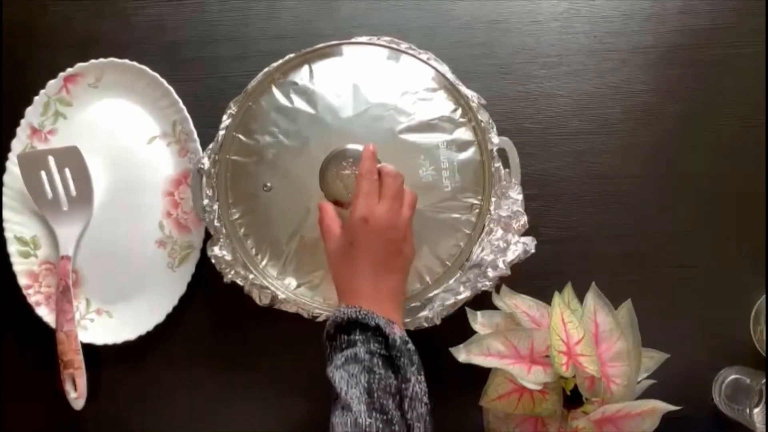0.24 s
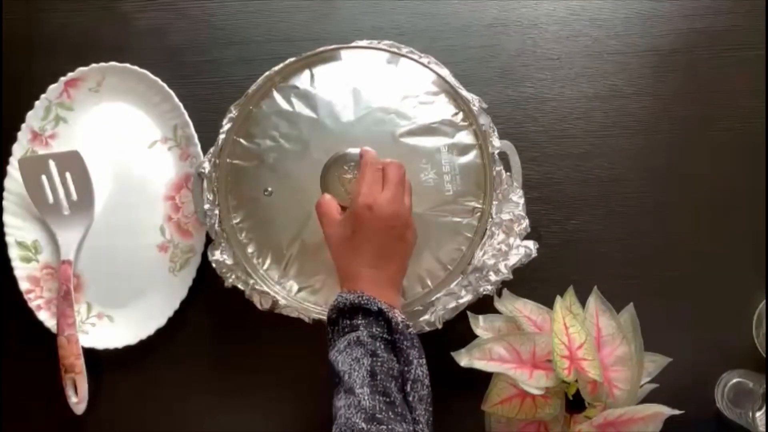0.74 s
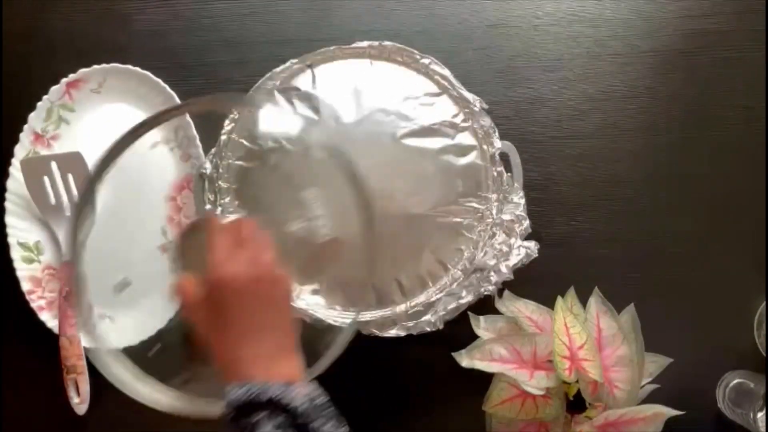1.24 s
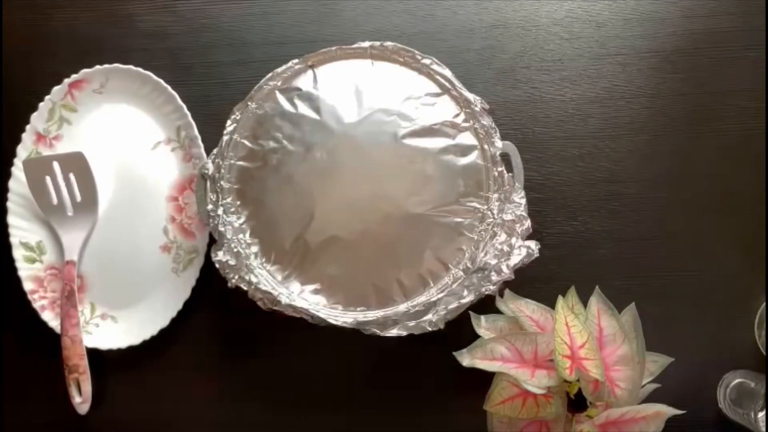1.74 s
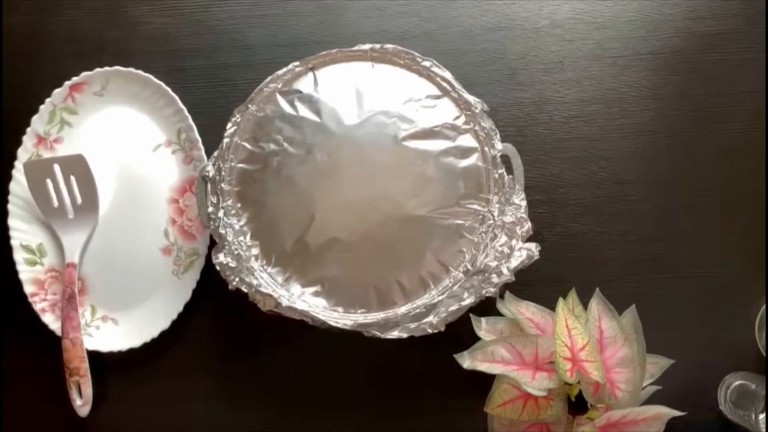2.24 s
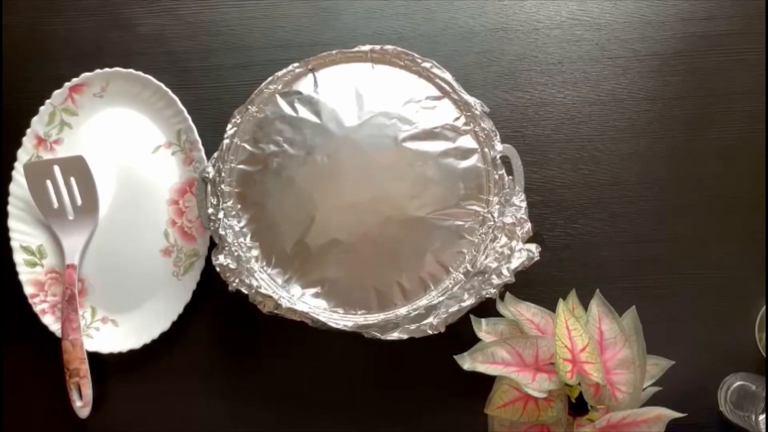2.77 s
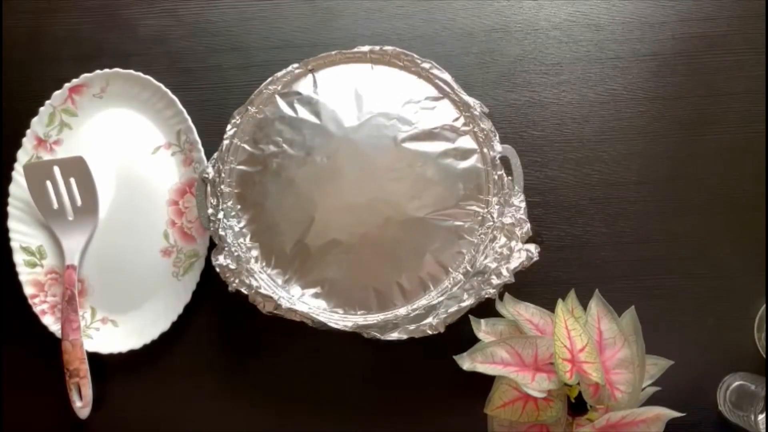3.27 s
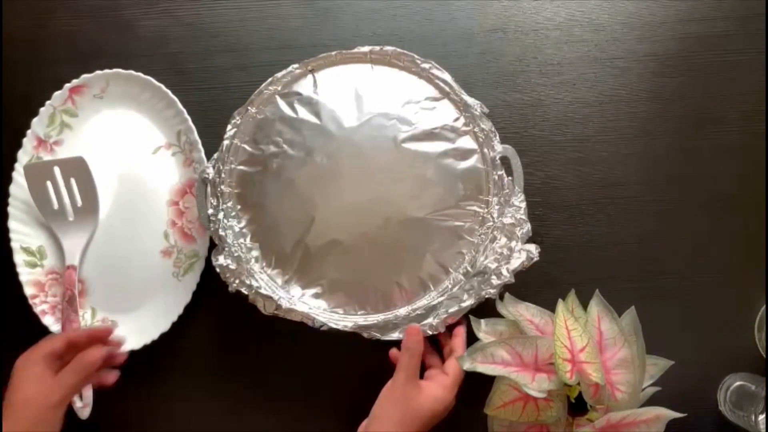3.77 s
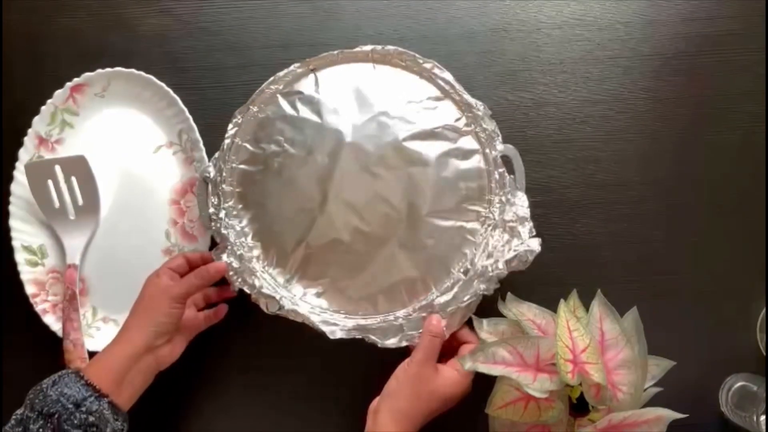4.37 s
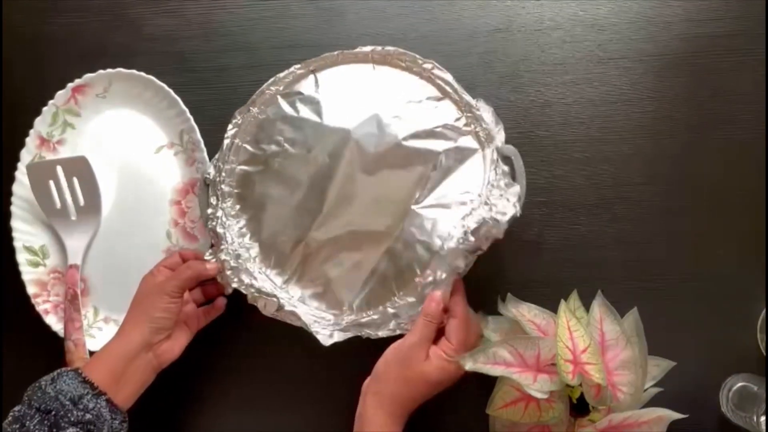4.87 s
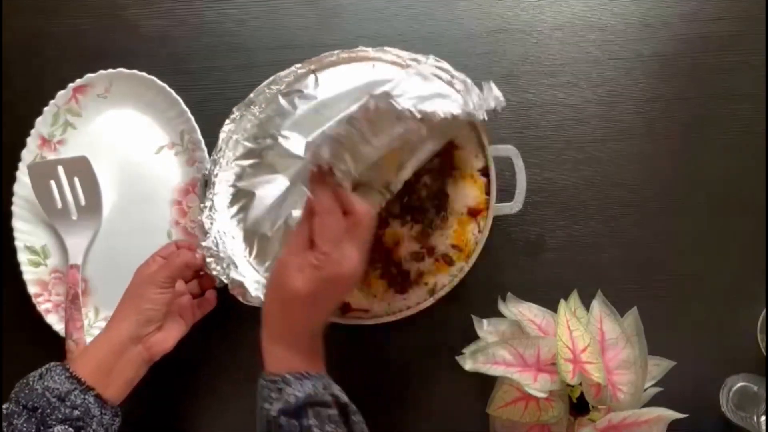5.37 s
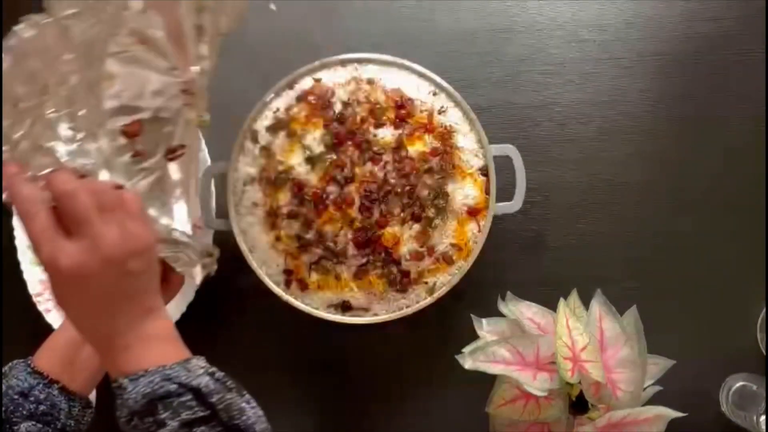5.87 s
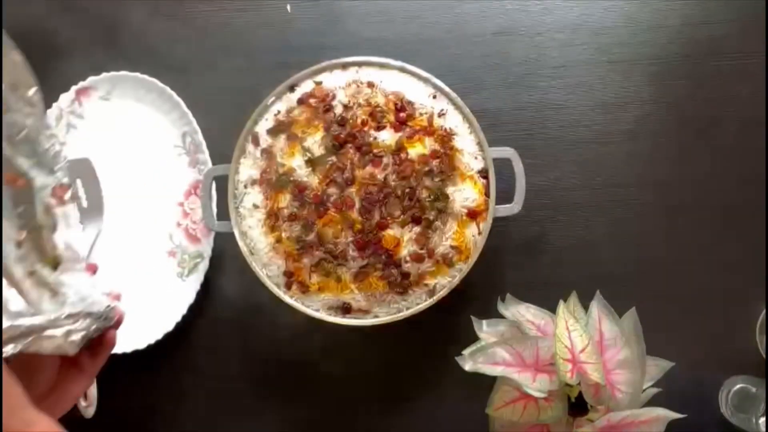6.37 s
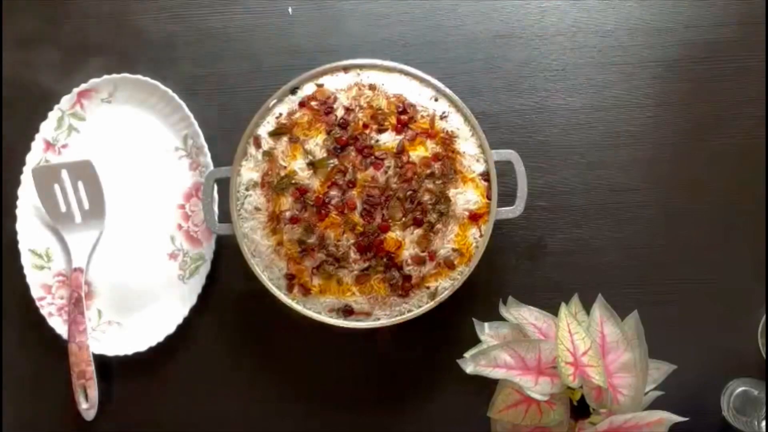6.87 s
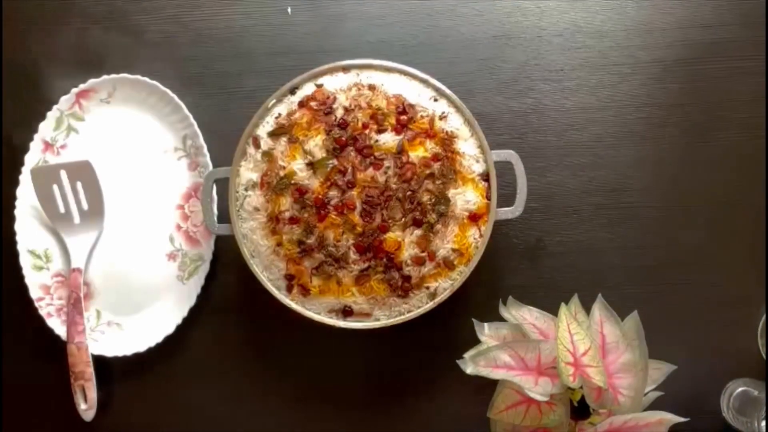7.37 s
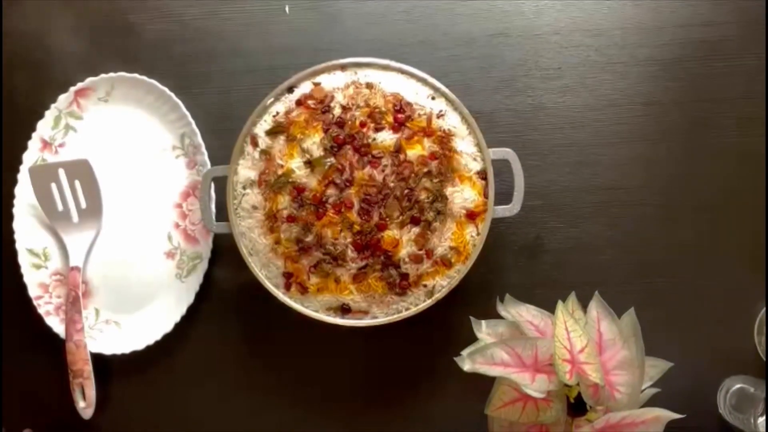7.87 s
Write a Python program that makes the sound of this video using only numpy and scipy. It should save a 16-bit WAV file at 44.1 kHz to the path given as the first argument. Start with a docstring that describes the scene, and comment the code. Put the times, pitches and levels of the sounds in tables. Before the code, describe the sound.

A lid comes off a foil-covered pot with a tiny crinkle and clink, slides faintly, and knocks twice on a surface a little farther away. After a quiet gap, close foil crackles in separate tugs, swells to a loud peel with snaps and dull drumming pops, then rustles softly as it is put aside. Steady low hum, live small kitchen, stereo microphones near the pot.

```python
"""Small, hard-walled kitchen: a glass lid leaves a foil-covered pot with ringing knocks and slides.
The foil is loosened, peeled back and put away: swarms of tiny filtered clicks follow each tug,
with sharp snaps (tick plus noise burst) and hollow pops (filtered bursts).
Behind: a bump on the table, motor and fan sines, filtered-noise air; two spaced ports pick it all up.
Table levels are relative; layer gains are added to them in scene()."""
import sys
import numpy as np
from scipy import signal
from scipy.fft import rfft, irfft, next_fast_len
from scipy.io import wavfile
from scipy.ndimage import uniform_filter1d

SR = 44100
rng = np.random.default_rng(int(sys.argv[2]) if len(sys.argv) > 2 else 0)


def waveform_to_disk(signal):
    """Save audio, clipped to [-1, 1], as 16-bit WAV at the path in sys.argv[1]."""
    frames = np.transpose(np.atleast_2d(signal))
    scaled = np.clip(frames, -1, 1) * 32767
    samples = np.round(scaled).astype(np.int16)
    wavfile.write(sys.argv[1], SR, samples)


N = 358091

# tugs and touches, from lifting the lid to peeling right off:
# peak_s, build_s, relax_s, flex_db (sheet), crumple_db (folds), crackle_db (creases)
FOIL_TUGS = [ (0.785, 0.058, 0.033, -53, -45, -48), (0.825, 0.018, 0.01, -42, -44, -45),
             (4.04, 0.035, 0.024, -53, -63, -53), (4.159, 0.01, 0.014, -50, -40, -40),
             (4.235, 0.029, 0.13, -44, -55, -41.5), (4.321, 0.032, 0.13, -41, -42, -41.5),
             (4.435, 0.028, 0.022, -39, -43.5, -39), (4.6, 0.029, 0.018, -38, -44, -60),
             (4.67, 0.05, 0.072, -35.5, -40, -36.5), (4.842, 0.045, 0.029, -35, -45, -32.5),
             (5.095, 0.0094, 0.0143, -55, -38, -47), (5.165, 0.019, 0.037, -42.5, -35.5, -41.5),
             (5.255, 0.042, 0.043, -34, -33.5, -36.5), (5.4, 0.029, 0.037, -32.5, -40, -29.5),
             (5.462, 0.033, 0.028, -35.5, -30.5, -28.5), (5.52, 0.053, 0.051, -37, -33, -37.5),
             (5.615, 0.07, 0.024, -39, -38, -39), (5.68, 0.019, 0.053, -48.5, -46, -55.5)]
# steady pull while peeling: start_s, end_s, flex_db, crumple_db, crackle_db
STEADY_PULL = (4.5, 5.5, -48, -45.5, -47.5)
PULL_EASE_S = 0.033
# colour of the broad sheet: freq_hz, level_db
FLEX_COLOUR = [(120, -31), (280, -6), (450, -1.5), (800, 0.7), (1450, 0.9), (2000, 2), (3000, -3),
               (4500, -18.5), (9000, -27.5)]
# colour of the folds: freq_hz, level_db
CRUMPLE_COLOUR = [(400, -22), (900, -8), (1400, -5), (1900, 0), (2450, 1), (3200, 2.5), (4200, -2),
                  (6000, -13), (11000, -24)]
# colour of the creases: freq_hz, level_db
CRACKLE_COLOUR = [(500, -29), (1500, -10.5), (2400, 1), (3100, 1), (4200, 1.5), (5200, 1), (6800, -1.5),
                  (8600, -6.5), (10000, -5.5), (11500, -10), (13000, -19)]


def crinkle(flex_db, crumple_db, crackle_db):
    """One swarm: dull through the sheet, full in the folds, bright at creases; tugs add in power."""
    start_s, end_s, *pull_db = STEADY_PULL
    pull = strain(start_s, end_s, PULL_EASE_S, PULL_EASE_S)
    power = (amp(pull_db)[:, None] * pull) ** 2
    for peak_s, build_s, relax_s, *levels_db in FOIL_TUGS:
        tug = strain(peak_s, peak_s, build_s, relax_s)
        power = power + amp(levels_db)[:, None] ** 2 * tug ** 2
    clicks = swarm(per_s=1600, spread_db=3, ring_s=0.00052, clump_db=0.8, shift_db=1.0)
    flex, crumple, crackle = reshape(clicks, patch_db=3.0) * np.sqrt(power)
    out = colour(flex, FLEX_COLOUR) * amp(flex_db)
    out += colour(crumple, CRUMPLE_COLOUR) * amp(crumple_db)
    out += colour(crackle, CRACKLE_COLOUR) * amp(crackle_db)
    return out


def strain(start_s, end_s, build_s, relax_s):
    """Strain on the sheet, 0-1: exponential build-up, hold from start to end, exponential release."""
    t = np.arange(N) / SR
    before = np.maximum(start_s - t, 0) / build_s
    after = np.maximum(t - end_s, 0) / relax_s
    return np.exp(-np.minimum(before + after, 20))


def swarm(per_s, spread_db, ring_s, clump_db, shift_db, count=8):
    """Random clicks of uneven size; each rings one of count facets, whose levels wander separately."""
    sizes = amp(spread_db * np.minimum(rng.exponential(1, N), 4))
    sizes *= rng.random(N) < per_s / SR
    sizes *= rng.choice([-1, 1], N)
    facet = rng.integers(0, count, N)
    clicks = np.zeros(N)
    for k in range(count):
        ring = unit(burst(ring_s, size=256))
        rung = signal.oaconvolve(sizes * (facet == k), ring)[:N]
        clicks += rung * amp(shift_db * wander(rate_hz=12))
    # level the 25 ms mean power, then clump
    mean_power = abs(uniform_filter1d(clicks ** 2, size=1100)) + 1e-9
    return unit(clicks / np.sqrt(mean_power) * amp(clump_db * wander(rate_hz=46)))


def reshape(x, patch_db):
    """As the sheet bends, its broad resonances come and go: smooth random gain over time and pitch."""
    z = signal.stft(x, nperseg=256)[2]
    patches = uniform_filter1d(rng.standard_normal(z.shape), size=6, axis=0)
    patches = uniform_filter1d(patches, size=9, axis=1)
    return unit(signal.istft(z * amp(patch_db * unit(patches)), nperseg=256)[1][:N])


# single creases: under the lid, loosening, raising, peeling, in the air, laid aside:
# start_s, level_db, dull_rel_db, tick_hz
CREASE_SNAPS = [ (0.745, -49, -9, 6500), (0.7779, -35.5, -13, 6840), (4.155, -32, -10, 9550),
                (4.1602, -32.5, -4, 6900), (4.2069, -30.5, -18, 7300), (4.2396, -36, -9, 7000),
                (4.3659, -33, -4, 7700), (4.401, -37, -12, 6000), (4.425, -35, -1, 4470),
                (4.5613, -44, 8, 3000), (4.595, -40, 11, 5470), (4.6356, -44, -2, 5900),
                (4.701, -29, -3, 6950), (4.8152, -33.5, 5.5, 4400), (4.839, -29.5, 8.5, 3040),
                (4.926, -35.5, -13, 6500), (4.942, -39, -17, 6000), (5.026, -22.5, -13, 6500),
                (5.0419, -28.5, -1, 7100), (5.093, -37.5, 2, 6500), (5.128, -45, -5, 6500),
                (5.156, -33, -8, 7000), (5.1859, -34, -6, 4000), (5.2, -35, -6, 5540),
                (5.2338, -30, 4, 6500), (5.3316, -37, -8, 7000), (5.377, -38, -7, 3300),
                (5.3966, -31, -1, 3400), (5.4423, -26.5, -3.5, 7260), (5.461, -28, -7, 3300),
                (5.514, -31, -6, 3500), (5.6064, -44, 10, 3000), (5.701, -50.5, -6, 4000),
                (5.892, -43.5, -3.5, 6960), (6.0738, -32.5, -1, 5000), (6.3084, -52, -3, 6560),
                (6.4648, -53, 5, 6960), (6.5837, -40.5, -6, 5060), (6.668, -54, -10, 6500),
                (6.7844, -42.5, -14, 7100), (6.828, -44, -14, 5500), (6.883, -38, -26, 5500),
                (6.8866, -29.5, -26, 5770), (6.9888, -32.5, -20, 4630), (7.158, -49, -10, 5000),
                (7.234, -32.5, -13, 4800), (7.317, -37, 1, 4000), (7.334, -38, -2, 2800),
                (7.484, -44, -3, 5500), (7.721, -42, 0, 2800), (7.832, -48, -10, 6000)]
# colour of a snapping crease: freq_hz, level_db
SNAP_COLOUR = [(500, -21), (1500, 0), (2800, -11.5), (3800, -1), (5500, 8), (7000, -4), (8600, 2),
               (11500, -3), (13000, -25)]


def snaps(bright_db, dull_db, tick_db, decay_s, tick_s):
    """A crease gives way at once: a sharp tick at its own pitch with a shiver of the sheet."""
    bright, dull, ticks = np.zeros(N), np.zeros(N), np.zeros(N)
    t = np.arange(256) / SR
    for start_s, level_db, dull_rel_db, tick_hz in CREASE_SNAPS:
        tick = np.sin(2 * np.pi * tick_hz * t) * np.exp(-t / tick_s)
        add(ticks, start_s, amp(level_db) * tick)
        add(bright, start_s, amp(level_db) * burst(decay_s))
        add(dull, start_s, amp(level_db + dull_rel_db) * burst(decay_s))
    out = ticks * amp(tick_db)
    out += colour(bright, SNAP_COLOUR) * amp(bright_db)
    out += colour(dull, FLEX_COLOUR) * amp(dull_db)
    return out


# taut foil over the hollow pot: start_s, level_db, decay_s
FOIL_POPS = [(4.159, -31.5, 0.0047), (4.317, -28.5, 0.0076), (4.334, -35.5, .008), (4.436, -37.5, 0.012),
             (4.62, -38.5, 0.024), (4.661, -31, 0.016), (4.719, -27.5, 0.0035), (4.839, -44, 0.0036),
             (5.205, -46, 0.0023), (5.618, -31.5, 0.014)]
# colour of the hollow: freq_hz, level_db
HOLLOW_COLOUR = [(150, -12.5), (300, -0.5), (400, 1), (510, 1.5), (650, -1.5), (850, -5.5), (1300, -13),
                 (2000, -15), (5000, -28.5)]


def pops(level_db):
    """The stretched sheet flips and drums on the air beneath it: bursts through the hollow's colour."""
    flips = np.zeros(N)
    for start_s, pop_db, decay_s in FOIL_POPS:
        add(flips, start_s, amp(pop_db) * burst(decay_s))
    return colour(flips, HOLLOW_COLOUR) * amp(level_db)


# freed sheet: carried through the air, laid down, pushed aside:
# peak_s, build_s, relax_s, level_db, crackle_rel_db
LOOSE_RUSTLES = [ (5.895, 0.014, 0.066, -54.5, 0), (6.076, 0.007, 0.012, -44.5, -3),
                 (6.22, 0.089, 0.13, -53, -18), (6.59, 0.028, 0.055, -62, 4.5),
                 (6.79, 0.012, 0.063, -69, 1), (6.893, 0.043, 0.05, -47, 4.5), (7.015, .012, 0.095, -58, 5),
                 (7.075, .05, 0.17, -58, -10), (7.238, 0.01, 0.035, -41, 2),
                 (7.345, 0.028, 0.096, -42.5, -1.5), (7.44, 0.04, 0.08, -47.5, 2.5),
                 (7.54, 0.052, 0.091, -46.5, -5), (7.632, .012, 0.028, -47, -16),
                 (7.733, 0.028, 0.053, -38, -5.5), (7.82, 0.019, 0.034, -45.5, 1.5),
                 (7.93, 0.053, 0.089, -47, -10), (8.03, 0.013, 0.079, -49.5, -6.5)]
# colour of the freed sheet: freq_hz, level_db
LOOSE_COLOUR = [(200, -19.5), (500, 2.5), (800, 1.5), (1100, -0.5), (1650, 0.5), (1900, 3.5), (2200, -1),
                (2900, -5), (3600, -6), (4500, -8), (7000, -9.5), (11000, -28.5)]


def loose_sheet(body_db, crackle_db):
    """The freed sheet has no tension and little bass: a dense, even rustle of clicks."""
    body, crackle = np.zeros(N), np.zeros(N)
    for peak_s, build_s, relax_s, level_db, crackle_rel_db in LOOSE_RUSTLES:
        power = (amp(level_db) * strain(peak_s, peak_s, build_s, relax_s)) ** 2
        body += power
        crackle += power * amp(crackle_rel_db) ** 2
    clicks = swarm(per_s=1800, spread_db=2.0, ring_s=0.0005, clump_db=1.0, shift_db=2)
    clicks = reshape(clicks, patch_db=4.5)
    out = colour(clicks * np.sqrt(body), LOOSE_COLOUR) * amp(body_db)
    out += colour(clicks * np.sqrt(crackle), CRACKLE_COLOUR) * amp(crackle_db)
    return out


# lid clinks when lifted, knocks when set down: start_s, level_db, ring_rel_db, favoured_hz
LID_KNOCKS = [(0.778, -43, 13, 3920), (2.269, -25.5, -3.5, 2500), (2.2745, -32.5, 5, 2550),
              (2.299, -41, 0, 2850), (2.333, -35, 3, 2508), (2.489, -32.5, 4.5, 2000),
              (2.4965, -25, -2, 2200), (2.512, -37, 9, 2440), (2.538, -39, 2, 6800),
              (2.556, -38.5, 11.5, 1950)]
# colour of the clack: freq_hz, level_db
KNOCK_COLOUR = [(150, -21), (400, 0), (900, 1), (1500, 3), (2500, 0), (4000, -4.5), (7000, -8), (9000, -17),
                (12000, -30)]


def lid_knocks(crack_db, ring_db, rattle_db, decay_s, rattle_s):
    """The rim strikes with a short clack, rings, and chatters unevenly as it settles."""
    cracks, rings, settling = np.zeros(N), np.zeros(N), np.zeros(N)
    fade = np.exp(-np.arange(SR // 2) / SR / rattle_s)
    for start_s, level_db, ring_rel_db, favoured_hz in LID_KNOCKS:
        ring = lid_ring(favoured_hz, focus_db=18, reach_octaves=0.29, scatter_db=4.5)
        add(cracks, start_s, amp(level_db) * burst(decay_s))
        add(rings, start_s, amp(level_db + ring_rel_db) * ring)
        add(settling, start_s, amp(level_db) * fade)
    chatter = swarm(per_s=350, spread_db=3, ring_s=0.00078, clump_db=-1.0, shift_db=-3.5)
    clack = cracks * amp(crack_db) + settling * chatter * amp(rattle_db)
    return colour(clack, KNOCK_COLOUR) + rings * amp(ring_db)


# modes of the glass: freq_hz, level_db, t60_s
GLASS_MODES = [(1033, 9, 0.1), (1880, -7, .08), (2000, 6, 0.09), (2310, -9, .06), (2460, 2, 0.06),
               (2600, -1, .05), (2870, -3, 0.074), (3440, 3, 0.074), (3720, 1, .08), (4000, -11, 0.087),
               (4540, -3, .07), (6000, -5, .1), (6500, -4, .1), (6800, -6, .1)]


def lid_ring(favoured_hz, focus_db, reach_octaves, scatter_db):
    """The held glass rings briefly; the place of contact decides which modes speak most."""
    t = np.arange(SR // 4) / SR
    ring = np.zeros(len(t))
    for freq_hz, level_db, t60_s in GLASS_MODES:
        nearness = np.exp(-(np.log2(freq_hz / favoured_hz) / reach_octaves) ** 2)
        weight_db = level_db + focus_db * nearness + scatter_db * rng.standard_normal()
        swing = np.sin(2 * np.pi * (freq_hz * t + rng.random()))
        ring += amp(weight_db - 60 * t / t60_s) * swing
    return ring / np.linalg.norm(ring)


# lid slides, last a hand brushing past:
# start_s, peak_s, end_s, level_db, rasp_hz, pole_width_hz, climb_per_s (share of rasp_hz), hiss_rel_db
SLIDE_STROKES = [(1.79, 1.803, 1.833, -65, 4000, 1100, 0.5, 4),
                 (1.908, 2.002, 2.18, -56.5, 4170, 900, 1.1, 9),
                 (2.617, 2.71, 2.79, -53, 3560, 750, 1.4, -6.5),
                 (2.933, 2.956, 2.98, -62, 4120, 1100, 0.5, 2),
                 (2.99, 3.098, 3.145, -58, 3100, 2600, -0.36, -4),
                 (3.887, 3.944, 3.99, -50.5, 2830, 1100, 1.1, -12)]
# colour of the hiss: freq_hz, level_db
HISS_COLOUR = [(400, -23), (1000, -4.5), (2000, 2.5), (2800, -1), (4400, -2.5), (5200, 7.5), (6300, -3),
               (7400, 2.5), (8600, -8), (11500, -16.5)]
# rasp resonances: ratio_to_rasp_hz, level_db
RASP_PARTS = [(1, 0), (1.38, -10), (1.85, -25)]


def slides(level_db, jerk_db, waver):
    """Friction grains under jerky strokes: a hiss, and rasping resonances that glide and waver."""
    grains = swarm(per_s=3000, spread_db=2.5, ring_s=0.00025, clump_db=0.8, shift_db=1.5, count=16)
    hiss = colour(reshape(grains, patch_db=3.5), HISS_COLOUR)
    t, out = np.arange(N) / SR, np.zeros(N)
    speed = wander(rate_hz=28)
    for start_s, peak_s, end_s, stroke_db, rasp_hz, width_hz, climb_per_s, hiss_rel_db in SLIDE_STROKES:
        on = (t > start_s) & (t < end_s)
        glide = 1 + climb_per_s * (t[on] - peak_s) + waver * speed[on]
        phase = 2 * np.pi * np.cumsum(rasp_hz * glide) / SR
        pole = np.exp(-np.pi * width_hz / SR)
        rasp = 0
        for ratio, part_db in RASP_PARTS:
            # moving resonance: shift down to 0 Hz, low-pass twice, shift back
            turn = np.exp(1j * ratio * phase)
            low = signal.lfilter([1], np.poly([pole, pole]), grains[on] / turn)
            rasp = rasp + amp(part_db) * unit((turn * low).real)
        stroke = np.sin(np.pi / 2 * np.interp(t[on], [start_s, peak_s, end_s], [0, 1, 0]))
        gain = amp(stroke_db + jerk_db * speed[on]) * stroke
        out[on] += gain * (rasp + amp(hiss_rel_db) * hiss[on])
    return out * amp(level_db)


# soft bump on the table: start_s, pitch_hz, level_db, decay_s
TABLE_BUMP = (3.012, 71, -27.5, 0.012)


def bump():
    """The table top gives one low, damped swing."""
    start_s, pitch_hz, level_db, decay_s = TABLE_BUMP
    t = np.maximum(np.arange(N) / SR - start_s, 0)
    return amp(level_db) * np.sin(2 * np.pi * pitch_hz * t) * np.exp(-t / decay_s)


MOTOR_HZ = 47.54  # steady turning
# course of the motor's level: time_s, level_db
MOTOR_COURSE = [(0, -45.5), (.75, -52), (1.3, -44.5), (2.1, -46.5), (2.8, -46.5), (3.4, -58.5), (4.25, -42),
                (5.25, -35.5), (8.12, -46)]
# motor tones: multiple_of_motor_hz, level_db (relative to the course's mean)
MOTOR_TONES = [(1, 0.5), (2, -6), (3, -6), (5, -8.5), (6, -10)]
# fan and mains tones: freq_hz, level_db
STEADY_TONES = [(88.5, -50.5), (100, -58.5), (110.6, -58.5), (133.1, -44.5), (147.5, -42.5), (200, -57.5),
                (247, -57), (266.5, -53.5), (357, -60)]


def hum(waver_rad, flutter_db):
    """Motor, fan and mains sines drift in phase and level; the motor's lowest orders swell most."""
    t = np.arange(N) / SR
    knots_s = np.arange(0, 9, .25)
    throb_db = np.interp(t, *np.transpose(MOTOR_COURSE))
    mean_db = throb_db.mean()
    swell_db = throb_db - mean_db
    tones = []
    for multiple, rel_db in MOTOR_TONES:
        order = round(multiple)
        tones.append((MOTOR_HZ * order, mean_db + rel_db + swell_db / order ** 1.8))
    out = np.zeros(N)
    for freq_hz, level_db in tones + list(STEADY_TONES):
        walk = np.cumsum(rng.standard_normal(len(knots_s)))
        drift_rad = waver_rad * np.interp(t, knots_s, walk)
        gain = np.sqrt(2) * amp(level_db + flutter_db * wander(rate_hz=4))
        out += gain * np.sin(2 * np.pi * (freq_hz * t + rng.random()) + drift_rad)
    return out


# colour of room air: freq_hz, level_db
AIR_COLOUR = [(20, -15.5), (45, 3), (90, 4.5), (170, -0.5), (280, 0.5), (420, -10), (800, -15.5),
              (1500, -19.5), (2400, -28.5), (4000, -35), (6500, -44.5), (8500, -55), (12000, -58)]
AIR_DB = -40.5


def air(swell_db):
    """Moving air: two independent noises, a soft rumble that swells slightly."""
    rush = np.array([colour(rng.standard_normal(N), AIR_COLOUR) for _ in range(2)])
    return amp(AIR_DB + swell_db * wander(rate_hz=2.2)) * rush


def kitchen(x, early_db, tail_db, early_s, count=1):
    """The room's answer; successive 34 ms slices take turns at count echo patterns."""
    place = np.arange(N) // 1500 % count
    out = np.zeros((2, N))
    for k in range(count):
        part = (x * (place == k))[None]
        out += signal.oaconvolve(part, echoes(early_db, tail_db, early_s), axes=1)[:, :N]
    return out


# reverberation time: freq_hz, t60_s
ROOM_DECAY = [(200, 0.82), (1000, 0.73), (4000, 0.56), (12000, 0.22)]


def echoes(early_db, tail_db, early_s):
    """Direct sound, quick reflections off table and walls, tail dying by band; two unlike pickups."""
    size = SR * 3 // 5
    t = np.arange(size) / SR
    taps = rng.choice([-1., 1.], (2, size))
    taps *= (rng.random((2, size)) < 1 / 8) * (t > .001)
    freq_hz, when_s, z = signal.stft(taps, SR, nperseg=256)
    fade_db = -60 * when_s / read(ROOM_DECAY, freq_hz)[:, None]
    tail = signal.istft(z * amp(fade_db), SR, nperseg=256)[1][:, :size]
    early = taps[::-1] * np.exp(-t / early_s)  # pickups swapped
    response = amp(tail_db) * tail / np.linalg.norm(tail[0])
    response += amp(early_db) * early / np.linalg.norm(early[0])
    response[0, 0] += 1
    response[1, :64] += unit(rng.standard_normal(64)) / np.sqrt(64)  # smeared direct sound
    return response / np.linalg.norm(response[0])


def amp(db):
    """Decibels to gain."""
    return 10 ** (np.asarray(db) / 20)


def unit(x):
    """Scales to rms 1."""
    return x / np.sqrt(np.mean(x ** 2) + 1e-20)


def read(points, freq_hz, axis=1):
    """Interpolates one table column over log frequency."""
    table = np.transpose(points)
    return np.interp(np.log(freq_hz + 1), np.log(table[0] + 1), table[axis])


def add(mix, start_s, sound):
    """Mixes a sound in at a time."""
    part = mix[max(round(start_s * SR), 0):][:len(sound)]
    part += sound[:len(part)]


def wander(rate_hz):
    """Slow random path of rms 1, through two random points per cycle of rate_hz."""
    knots = np.arange(0, N + SR, SR / (2 * rate_hz))
    return unit(np.interp(np.arange(N), knots, rng.standard_normal(len(knots))))


def colour(x, spectrum, size=4096):
    """Causal minimum-phase filter that keeps the power of white noise."""
    log_gain = np.log(amp(read(spectrum, abs(np.fft.fftfreq(size, 1 / SR)))))
    taps = np.fft.ifft(np.exp(np.conj(signal.hilbert(log_gain)))).real
    return signal.oaconvolve(x, taps / np.linalg.norm(taps))[:N]


def burst(decay_s, size=2048):
    """A crack: noise with exponential decay."""
    return rng.standard_normal(size) * np.exp(-np.arange(size) / SR / decay_s)


def scene():
    """Foil near the ports, lid and freed sheet further off, hum and air behind."""
    foil = crinkle(flex_db=2.0, crumple_db=-7.0, crackle_db=1.0) + pops(level_db=4.0)
    creases = snaps(bright_db=7.5, dull_db=5.5, tick_db=14.5, decay_s=0.00093, tick_s=0.0002)
    loose = loose_sheet(body_db=0.54, crackle_db=1.7)
    lid = lid_knocks(crack_db=3.5, ring_db=14.5, rattle_db=-15.5, decay_s=0.0014, rattle_s=0.028)
    strokes = slides(level_db=2.0, jerk_db=0.5, waver=0.01)
    out = kitchen(foil, early_db=-1.0, tail_db=-7.0, early_s=0.0085, count=3)
    out += kitchen(creases, early_db=-3, tail_db=-4.5, early_s=0.0055, count=3)
    out += kitchen(loose, early_db=-3.0, tail_db=0.5, early_s=0.0086, count=2)
    out += kitchen(lid, early_db=-8, tail_db=-1.5, early_s=0.0064, count=2)
    out += kitchen(strokes, early_db=-10, tail_db=0.0, early_s=0.01)
    out += air(swell_db=1.56)
    out[0] += hum(waver_rad=0.23, flutter_db=1.5) + bump()
    return out


# the two ports: freq_hz, likeness (0-1), left_lead_rad, left_minus_right_db
PORT_PAIR = [(25, .995, 0, 0), (60, .975, 0, .2), (140, .92, 0, .1), (280, .95, .05, 0), (380, .9, .2, .5),
             (550, .66, .7, 4), (1000, .62, .5, 3), (2200, .3, -1.7, .7), (2700, .2, -1.5, .3),
             (3300, .45, -.5, .5), (4200, .4, -1.9, .7), (4800, .95, -3.1, 0), (5500, .88, -3.3, 0),
             (6200, .55, -4.9, 0), (6900, .87, -6.2, 0), (8000, .83, -6.5, 0), (8700, .99, -9.35, 0),
             (10100, .99, -9.5, 0), (10700, .8, -12.5, -1)]
CUTOFF_HZ = 11950


def record(dry):
    """Spaced ports share the bass and part in phase higher up; then a low-pass band limit."""
    size = next_fast_len(N + 4096)
    freq_hz = np.fft.rfftfreq(size, 1 / SR)
    common, other = rfft(dry, size)
    same = np.clip(read(PORT_PAIR, freq_hz, axis=1), 0, 1)
    # half of each difference goes to either port
    lead = np.exp(.5j * read(PORT_PAIR, freq_hz, axis=2))
    lean = amp(read(PORT_PAIR, freq_hz, axis=3) / 2)
    left = common * lead * lean
    right = (same * common + np.sqrt(1 - same ** 2) * other) / lead / lean
    pair = irfft(np.array([left, right]), size)[:, :N]
    low_pass = signal.firwin(255, CUTOFF_HZ, window=("kaiser", 9), fs=SR)
    return signal.oaconvolve(pair, low_pass[None], "same")


dry = scene()
out = record(dry)
waveform_to_disk(out)
```